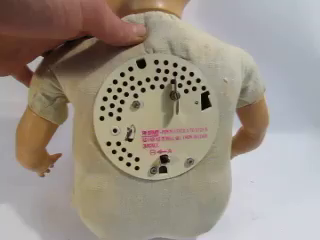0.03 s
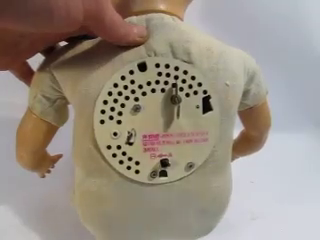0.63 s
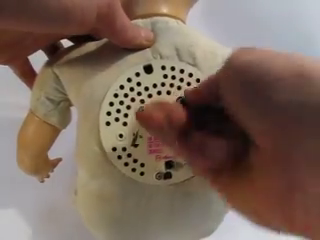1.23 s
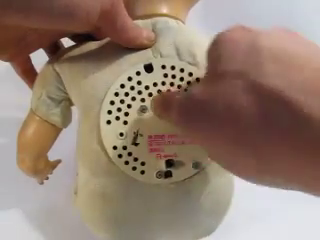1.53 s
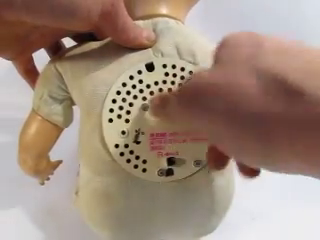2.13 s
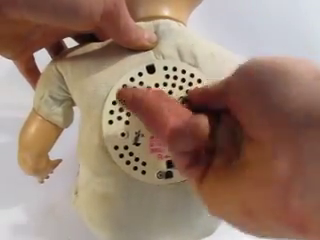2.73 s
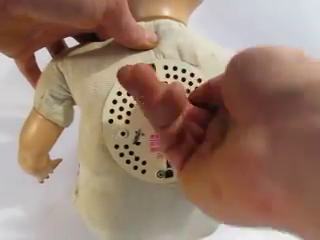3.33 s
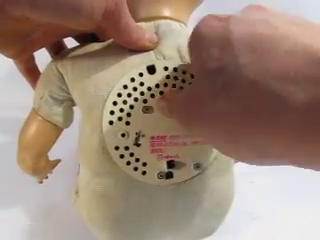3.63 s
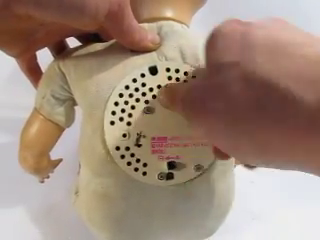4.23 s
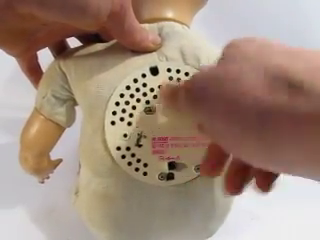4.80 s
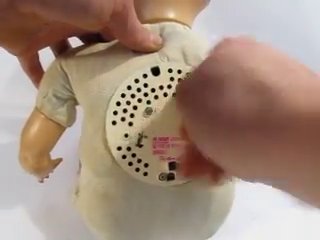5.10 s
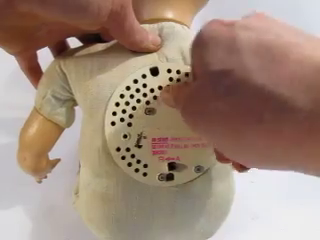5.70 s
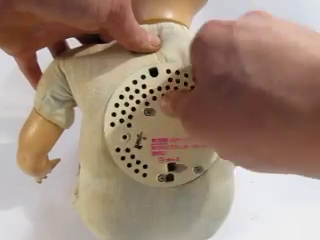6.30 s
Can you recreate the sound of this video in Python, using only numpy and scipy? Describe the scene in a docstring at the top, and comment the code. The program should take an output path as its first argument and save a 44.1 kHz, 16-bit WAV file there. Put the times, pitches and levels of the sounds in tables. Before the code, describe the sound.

For the first second there is only a small room's low rumble and soft hiss, with faint mains hum and a thin whine that stay throughout. A fingernail ticks lightly on the wind-up key of an old cloth doll just before 1 second. Then the key is twisted eight times, close to a stereo microphone, at about 1.1, 1.7, 2.5, 3.1, 3.7, 4.4, 5.0 and 5.7 seconds. Each twist lasts roughly a third of a second: a click as the slack is taken up, a gritty gear grind, two crunchy ratchet snaps, and a knock as the key springs back. That knock is softer at 2 seconds and barely there at 5.3. The clicks ring the plastic case, with a faint steel spring shimmer and short wall reflections. Fingers quietly rub key and cloth around 2.2 and 5.5 seconds, and the stuffed body occasionally thuds softly. The last knock comes just after 6 seconds.

```python
"""The wind-up key of an old cloth-bodied doll, eight twists by hand, close to a stereo camera microphone.
In each twist the key takes up its slack, the gear grinds, the pawl crunches over two teeth, and the key
knocks back as it is let go. It all rings the plastic motor case and, faintly, the mainspring.
Fingers rub and tap between twists. The room is small: near walls, low rumble, hiss, mains hum and a
thin whine."""
import sys
import numpy as np
from scipy import signal
from scipy.fft import rfft, irfft
from scipy.io import wavfile

SR = 44100
rng = np.random.default_rng(int(sys.argv[2]) if len(sys.argv) > 2 else 0)


def put_to_file(sound):
    """Save the sound as 16-bit audio at rate SR, in the file named by the first command-line argument."""
    columns = np.atleast_2d(sound).T  # one column per channel
    safe = np.clip(columns, -1, 1)
    whole_steps = np.round(safe * 32767)
    wavfile.write(sys.argv[1], SR, whole_steps.astype(np.int16))


N = 280035
TIME = np.arange(N) / SR
CLICK_SIZE = 4096  # samples

# Levels are relative within a layer; body, brightness and ping are the tone controls of tone_db.
# twists of the key: (start t/s, stop t/s, drag level/dB, last scrape level/dB, body/dB, brightness/dB)
TWISTS = [(1.11, 1.305, -35, -27, 1, -1), (1.675, 1.955, -43, -34, -1, -1), (2.491, 2.714, -35, -30, 3, 1),
          (3.095, 3.335, -39, -31, -1, 0), (3.72, 3.976, -33, -26, 0, 1), (4.36, 4.595, -35, -28, -2, 0),
          (5.04, 5.279, -34, -26, 0, 1), (5.708, 5.981, -37, -31, -1, 0)]
# the pawl crunches over a tooth and snaps, twice a twist:
# (t/s, crunch level/dB, build/s per 20 dB, fall/s per 20 dB, snap level/dB, body/dB, brightness/dB)
TEETH = [(1.173, -23, 0.0277, 0.0163, -18.5, 1.5, 4.5), (1.2809, -18.5, .015, 0.03, -13, -3, 1.5),
         (1.7442, -21, .008, .022, -13.5, -7, 4.5), (1.9022, -17, 0.0167, 0.0446, -18, -15, 5),
         (2.5386, -25, 0.0533, 0.05, -12, -5, 2), (2.6495, -15, .026, .022, -13, 5, 11),
         (3.143, -17, 0, 0.0251, -14, 2.5, 8), (3.2695, -24, .045, .055, -15.5, -10, 0.5),
         (3.766, -21, 0.0131, .025, -13, -1.5, 5), (3.9035, -17.5, 0.0261, .04, -19, -3.5, 12),
         (4.4121, -21, 0.03, 0.0145, -14.5, -6, 3), (4.5212, -23, 0.018, 0.0529, -12.5, -3, 0.5),
         (5.069, -23, 0.0233, 0.1039, -14, -6.5, 2.5), (5.1864, -24, 0.05, 0.0032, -19, -4, 4),
         (5.7803, -18, .018, 0.0183, -18.5, -7, 2), (5.8995, -19, 0.0236, 0.0468, -16.5, -1.5, 4.5)]
# the loudest catches of the gear: (t/s, level/dB, body/dB, brightness/dB)
CATCHES = [(1.1303, -18.5, -11, -6), (1.166, -17, -7, -2.5), (1.1857, -17.5, 6, 2),
           (1.211, -21.5, -4.5, -6), (1.273, -16, 0, 7.5), (1.3338, -27, -3.5, -0.5), (1.3407, -29, 4, 0.5),
           (1.768, -26.5, -0.5, -4), (1.8224, -35.5, 1, -2.5), (1.889, -17, -15, 3.5),
           (1.9365, -29.5, 3, 4), (2.5081, -29, 0, -2), (2.5334, -19.5, 3.5, 6), (2.5623, -21.5, 2.5, 3.5),
           (2.6168, -27.5, 11.5, -3), (2.7103, -28, -4, -4), (3.1698, -31, 6, 0),
           (3.2975, -18.5, -7.5, -1.5), (3.311, -25.5, 2.5, -2), (3.3888, -28, -3, -1),
           (3.8493, -26, 6.5, 7.5), (3.8706, -24.5, -2, 4), (3.8861, -21.5, -8.5, 6.5),
           (3.9235, -23, -2, 3), (3.934, -20.5, -1, -0.5), (3.9615, -32, -5, -2), (4.0672, -34, -7, 2),
           (4.4035, -13.5, -6.5, 2), (4.4212, -20.5, 1, -3), (4.4445, -23.5, -6, -1.5),
           (4.4513, -24, -1, 1), (4.4645, -28, -3, 2), (4.4872, -28, -5, 1), (4.4998, -24, -6, 1),
           (4.5738, -27, -11, 1.5), (4.5466, -14, -6, 1), (5.0447, -28, 7, 8), (5.0726, -17, -6, -2),
           (5.1186, -30, 6, 3), (5.1702, -27, 2, 6), (5.2241, -20.5, -6, 2.5), (5.7735, -19, -4.5, 9),
           (5.8049, -23.5, 1.5, -1), (5.8278, -33, -3, -4), (5.935, -27.5, -8, -3.5), (6.0369, -29, -3, -7)]
# the key knocks back as it is let go: (t/s, level/dB, body/dB, brightness/dB, ping/dB,
# first touch ahead/s, first touch level/dB, slip back level/dB, ring after/s)
RELEASES = [(1.3728, -14, 1.5, 4, -3.5, .003, -13.5, -31, .128),
            (1.9915, -25.5, 11, 0.5, -3.5, .0048, -25, -50, .07),
            (2.7498, -15.5, 4.5, 4.5, 7, .004, -21, -39, .185),
            (3.4, -13.5, -4, 1, 1, .005, -18, -34, .155), (4.043, -13, 2, 1, 9, .0043, -25, -39, .167),
            (4.6755, -15, 1.5, 0.5, 9, .0048, -23, -38, .222),
            (5.3217, -44, 5, -6.5, 7.5, .005, -52, -56, .11),
            (6.0498, -12.5, -1, 1, 9, .0039, -16, -36, .175)]


def contacts():
    """Blows of key, pawl and gear, and release echoes: (t/s, level/dB, body/dB, brightness/dB, ping/dB)."""
    # a nail meets the key: (t/s, level/dB, body/dB, brightness/dB, ping/dB)
    fingernail = (.959, -38, 7, -11, 5)
    # the key takes up its slack, two rattles and a knock: (t/s, level/dB, body/dB, brightness/dB,
    # ping/dB, first rattle ahead/s, second rattle ahead/s, second rattle level/dB)
    grips = [(1.1332, -15, 8, 4, -2.5, 0.033, 0.027, -19.5),
             (1.6965, -12.5, .5, 4, 7.5, 0.028, 0.014, -19.5),
             (2.4905, -13, -1, -3, -1, 0.013, .0038, -23.5),
             (3.1047, -9.7, 1.5, 1.5, 5.5, 0.023, 0.011, -23),
             (3.7322, -14.5, 4.5, 4.5, -12, 0.02, .0005, -22), (4.368, -15, -3, 7, -5.5, 0.022, .0111, -22),
             (5.0294, -18, 4.5, -2, 9, 0.026, .0159, -30.5), (5.7137, -19, 0, -3, -5, 0.0099, .0024, -25)]
    hits = [fingernail]
    for s, db, body, bright, ping, first, second, rattle_db in grips:
        rattle_tone = (body - 6.5, bright - 5, 0)  # thinner and duller than the knock
        hits.append((s, db, body, bright, ping))
        hits.append((s - first, rattle_db - 11.5, *rattle_tone))
        hits.append((s - second, rattle_db, *rattle_tone))
    for s, db, body, bright, ping, ahead, touch_db, *_ in RELEASES:
        hits.append((s - ahead, touch_db, body - 9, bright - 6, 0))
        hits.append((s, db, body, bright, ping))
        hits.append((s + .0405, db - 25.5, body, bright, 0))  # faint echo of the knock, 40 ms later
    hits += [(s, db, body, bright, 0) for s, _, _, _, db, body, bright in TEETH]
    return hits + [(*row, 0) for row in CATCHES]


def clicks(gain_db=.3):
    """Each slip of the pawl or knock of the key rings the case with its own tone."""
    out = np.zeros((2, N + CLICK_SIZE))
    attack = int(.004 * SR)
    for s, db, *tone in contacts():
        hit = colour(snap(t60=.021, rise_s=.0004), case_db(CLICK_SIZE) + tone_db(*tone))
        attack_rms = np.sqrt(np.mean(hit[:, :attack] ** 2))
        start = int(s * SR)
        out[:, start:start + CLICK_SIZE] += hit * undb(db + gain_db) / attack_rms
    return out[:, :N]


def snap(t60, rise_s):
    """One contact, in stereo: dense reflections build up inside the case, then die away."""
    t = np.arange(CLICK_SIZE) / SR
    envelope = undb(-60 * t / t60) * (1 - np.exp(-t / rise_s))
    return microphone(rng.standard_normal((2, CLICK_SIZE)) * envelope)


def case_db(size, spot_db=4.2):
    """Response of the plastic motor case: each struck spot favours its resonances differently."""
    # resonances of the case and key: (f/Hz, width/Hz, lift/dB)
    modes = [(585, 45, 4), (880, 61, 8), (1000.5, 105, 11.5), (1300, 150, 6), (1560, 140, 9),
             (2117, 130, 11), (2680, 240, 4.5), (3313, 140, 8), (3923, 160, 8), (4980, 100, 6),
             (5590, 210, 8), (6200, 140, 7), (7750, 380, 2.5), (8750, 630, 2.5), (10800, 450, 6),
             (12350, 480, 5), (15320, 130, 6.5)]
    # spectrum of a bare contact: (f/Hz, level/dB)
    contact = [(100, -27.5), (250, -14), (450, -10.5), (800, -3.5), (1300, -5.5), (1780, -7.5), (2400, -1),
               (3400, -3), (4300, -8), (5400, -2), (8000, -3), (10000, -8.5), (14000, -14), (16000, -18.5)]
    favour_db = spot_db * (2 * rng.random(len(modes)) - 1)
    lift = sum((undb(db + extra) ** 2 - 1) * resonance(hz, width, size)
               for (hz, width, db), extra in zip(modes, favour_db))
    return across(contact, size) + 10 * np.log10(np.maximum(1 + lift, .1))


def tone_db(body_db, bright_db, ping_db):
    """Tone of one contact: body below 1.5 kHz, brightness above 4.4 kHz and the steel key's ping."""
    body = across([(150, .5), (500, 1), (1200, 1), (1900, 0)], CLICK_SIZE)
    bright = across([(3600, 0), (5200, 1)], CLICK_SIZE)
    ping = resonance(centre_hz=5450, width_hz=570, size=CLICK_SIZE)
    return body_db * body + bright_db * bright + ping_db * ping


def gear_load():
    """The load on the gear follows whichever drag, scrape or strain is strongest at the moment."""
    surges = []  # (start t/s, stop t/s, level/dB, build/s, fall/s)
    for start, stop, drag_db, scrape_db, *_ in TWISTS:
        surges.append((start, stop - .035, drag_db, .008, .016))
        surges.append((stop, stop, scrape_db, .025, .014))  # the wrist slows
    surges += [(s, s, db, build_s, fall_s) for s, db, build_s, fall_s, *_ in TEETH]
    surges += [(s, s, db - 10, .008, .008) for s, db, *_ in CATCHES]  # grating around each catch
    surges += [(s, s, db, .055, .014) for s, *_, db, _ in RELEASES]  # the key slides back
    load = np.zeros(N)
    for row in surges:
        load = np.maximum(load, surge(*row))
    return load


def grind(slow_hz=140, load_hz=5500, jitter=.7, scatter_db=4.5, gain_db=-2, spot_count=7):
    """The gear sticks and slips unevenly, quicker under load; each twist strikes new spots of the case."""
    load = gear_load()
    slip_hz = slow_hz + load_hz * load
    gap_draw, size_draw = (2 * rng.random((N // 50, 2)) - 1).T
    starts = np.searchsorted(np.cumsum(slip_hz) / SR, np.cumsum(np.exp(jitter * gap_draw)))
    sizes = undb(scatter_db * size_draw)
    spots = rng.integers(0, spot_count, len(starts))
    force = load * np.sqrt(SR / slip_hz / CLICK_SIZE)  # loudness follows load, not slip rate
    gear_db = across([(200, -5), (500, -6), (1000, -1.5), (1600, -2), (2400, 1), (3500, -1),
                      (6000, -1), (14000, -3.5)], CLICK_SIZE)
    out = np.zeros((2, N + CLICK_SIZE))
    for start, stop, _, _, body_db, bright_db in TWISTS:
        first, last = int((start - .012) * SR), int((stop + .11) * SR)
        twist_db = gear_db + tone_db(body_db, bright_db, 0)
        for spot in range(spot_count):
            here = (spots == spot) & (starts >= first) & (starts < last)
            slips = np.bincount(starts[here] - first, sizes[here], last - first) * force[first:last]
            ring = colour(snap(t60=.018, rise_s=.0005), case_db(CLICK_SIZE) + twist_db)
            out[:, first:last + CLICK_SIZE - 1] += signal.oaconvolve(slips[None], unit(ring), axes=1)
    return out[:, :N] * undb(gain_db)


def taps(contact_s=.0007, scuff_db=-7):
    """A soft fingertip rings the slack key, with a little scuff."""
    # fingertips finding the key: (t/s, level/dB)
    touches = [(3.0325, -40), (3.659, -31.5)]
    # modes of the loose key: (f/Hz, t60/s, level/dB)
    key_modes = [(570, 0.024, 0), (759, 0.031, -6), (1055, .025, -5.5), (2450, 0.014, -4.5),
                 (3220, .022, -0.5), (3920, .015, -9.5), (5600, .018, -12.5), (6230, .016, -10),
                 (7250, .012, -10), (8100, .018, -10.5)]
    out = np.zeros((2, N))
    t = np.arange(CLICK_SIZE) / SR
    onset = 1 - np.exp(-t / contact_s)
    for s, db in touches:
        ring = sum(undb(mode_db - 60 * t / t60) * np.sin(2 * np.pi * (hz * t + rng.random()))
                   for hz, t60, mode_db in key_modes)
        scuff = undb(scuff_db) * snap(t60=.02, rise_s=.0005)
        start = int(s * SR)
        out[:, start:start + CLICK_SIZE] += 2 * undb(db) * (ring * onset + scuff)
    return out


def spring(blows, gain_db=-88, detune=.04, coils=7):
    """The blows leave the steel mainspring ringing; its detuned coils beat against each other."""
    # clusters of coil modes: (f/Hz, t60/s, level/dB)
    clusters = [(2260, 0.38, -6.5), (2660, .4, -4.5), (3350, 0.44, 0.5), (5210, 0.6, -8.5),
                (6200, 0.32, -2.5), (7700, 0.36, 1.5)]
    t = np.arange(SR // 2) / SR
    ring = 0
    for hz, t60, db in clusters:
        coils_hz = hz * (1 + detune * (2 * rng.random((coils, 1)) - 1))
        phases = rng.uniform(0, 2 * np.pi, (coils, 1))
        ring += undb(db - 60 * t / t60) * np.sin(2 * np.pi * coils_hz * t + phases).sum(axis=0)
    return undb(gain_db) * signal.oaconvolve(blows, ring[None], axes=1)[:, :N]


def after_ring(half_width_s=.012, db=-61.5):
    """A faint, brief ring near 2.6 kHz shortly after each release."""
    # spectrum of the ring: (f/Hz, level/dB)
    spectrum = [(1000, -22), (1900, -20), (2250, -3), (2600, 0), (2850, -2), (3200, -9), (3800, -25),
                (7000, -24), (8000, -19), (9000, -30)]
    return noise(spectrum) * swells([(s + after, half_width_s, db) for s, *_, after in RELEASES])


def fingers(grain_db=1.5, grain_hz=400):
    """Skin rubs the key in small catches that ring the case, and brushes the cloth."""
    # fingers taking a new grip: (t/s, half width/s, level/dB)
    rubs = [(2.06, 0.0065, -52), (2.121, .0025, -51), (2.226, 0.0051, -43.5), (2.245, 0.0047, -42),
            (2.345, .011, -51), (2.374, 0.0075, -46), (5.454, 0.0073, -44.5), (5.466, 0.0062, -50),
            (5.55, .02, -60.5)]
    # skin excites the case mostly in the upper middle: (f/Hz, level/dB)
    rub_colour = [(200, -16), (1000, -1), (1700, -3.5), (2200, 2.5), (2520, 6), (2900, 3.5), (3900, -14.5),
                  (5600, -7), (9000, -14.5), (11000, -9), (16000, -23)]
    # strokes over the cloth body: (t/s, half width/s, level/dB)
    brushes = [(2.14, 0.031, -72), (2.236, 0.0075, -49.5), (2.372, 0.008, -54.5), (4.279, 0.0024, -62.5)]
    # spectrum of brushed cloth: (f/Hz, level/dB)
    brush_colour = [(500, -4), (2000, 1), (4200, -12), (6300, 2), (9000, -7), (11000, 2), (13000, -19),
                    (16000, -22)]
    roughness = np.interp(TIME * grain_hz, np.arange(N // 20), rng.standard_normal(N // 20))
    grain = undb(grain_db * roughness)
    friction = microphone(rng.standard_normal((2, N))) * grain
    rub = unit(colour(friction, case_db(N) + across(rub_colour, N))) * swells(rubs)
    brush = noise(brush_colour) * unit(grain) * swells(brushes)
    return rub + brush


def body_thuds():
    """The stuffed body thuds softly as it shifts under the hand."""
    # shifts of the body: (t/s, half width/s, level/dB)
    shifts = [(1.283, .019, -51), (2.18, .015, -54), (2.36, .028, -49), (2.64, .014, -46),
              (4.03, .035, -48), (5.85, .02, -48)]
    stuffing = noise([(30, -19), (70, -6.5), (120, 1.5), (165, -7), (230, -26), (500, -45), (2000, -74)])
    return stuffing * swells(shifts)


def room(x, wet_db=-24.5, first_s=.024, hold_s=.058, t60=.095, late_db=-23, late_t60=.42):
    """Near walls answer evenly for a moment, then the sound drops quickly into a faint tail."""
    t = np.arange(SR // 2) / SR
    early = undb(-60 * np.maximum(t - hold_s, 0) / t60)
    late = undb(late_db - 60 * t / late_t60)
    echoes = microphone(rng.standard_normal((2, len(t))) * (early + late) * (t > first_s))
    walls = [(200, -1.5), (1000, -.5), (2300, -5), (4200, 2), (5500, -7), (7000, -4), (14000, -2)]
    response = unit(colour(echoes, across(walls, len(t)))) / np.sqrt(len(t))
    return undb(wet_db) * signal.oaconvolve(x, response, axes=1)[:, :N]


def rumble(drone_hz=40.5, waver_hz=3.2, drone_db=-4.2, noise_db=-1.5):
    """The room's low end: a wavering drone over rumble, a little right of centre."""
    # rise and fall of both: (t/s, level/dB)
    levels = [(0, -77), (.04, -42.5), (.55, -48.5), (.75, -43), (1.05, -43), (1.5, -53), (2.4, -51),
              (3.5, -60), (4.4, -53), (4.85, -57), (5.5, -54), (6.35, -54)]
    # spectrum of the rumble: (f/Hz, level/dB)
    spectrum = [(20, -2.5), (32, -0.5), (50, -3), (62, -7), (85, -15), (110, -11), (170, -26), (400, -37),
                (1000, -60.5)]
    waver = np.interp(TIME, np.linspace(0, TIME[-1], N // 4000), rng.standard_normal(N // 4000))
    drone = np.sqrt(2) * np.sin(2 * np.pi * np.cumsum(drone_hz + waver_hz * waver) / SR)
    low = undb(drone_db) * drone + undb(noise_db) * noise(spectrum)
    pan = undb([[-1.2], [1.2]])
    return low * curve(levels) * pan


def air():
    """Airy room hiss, swelling as the arm reaches in."""
    # rise and fall of the hiss: (t/s, level/dB)
    levels = [(0, -93), (.04, -65.5), (.5, -62.5), (.95, -54.5), (1.55, -65), (2.15, -58), (2.9, -62.5),
              (3.6, -62.5), (4.85, -70.5), (5.6, -65), (6.35, -66)]
    # spectrum of the hiss: (f/Hz, level/dB)
    spectrum = [(60, 4), (200, 0.5), (400, -2.5), (800, -6), (1600, -10.5), (3200, -16), (7000, -21),
                (11000, -23), (15000, -25.5)]
    return noise(spectrum) * curve(levels)


def hum():
    """Mains hum and a thin electronic whine, steady and centred."""
    # hum and whine: (f/Hz, rms level/dB)
    tones = [(119.8, -67.5), (15700, -77.5)]
    return sum(undb(db) * np.sqrt(2) * np.sin(2 * np.pi * hz * TIME) for hz, db in tones)


def microphone(pair):
    """Two unrelated signals become left and right: alike in the bass, less so in the treble."""
    # difference between the two microphone ports: (f/Hz, side minus mid/dB)
    port_side = [(40, -14), (120, -11), (300, -17), (700, -25), (1300, -24), (3000, -18), (4400, -8),
                 (5800, -14), (8000, -8), (10000, -4), (15000, -3.5)]
    # balance of the ports: (f/Hz, left minus right/dB)
    port_balance = [(500, -.5), (1600, -.3), (2300, -3.5), (3600, -4), (5000, 2), (6500, .5), (7800, 2.2),
                    (9300, 2.2), (11000, .8), (15000, 1)]
    size = pair.shape[-1]
    spread = undb(across(port_side, size))
    mid, side = rfft(pair) / np.sqrt(1 + spread ** 2)
    sign = np.array([[1], [-1]])
    balance = undb(sign * across(port_balance, size) / 2)
    return irfft((mid + sign * spread * side) * balance, size)


def noise(spectrum):
    """Steady stereo noise at unit rms, shaped by (f/Hz, level/dB) rows."""
    return unit(colour(microphone(rng.standard_normal((2, N))), across(spectrum, N)))


def colour(x, db):
    """Minimum-phase filter with the given dB at each bin, so that resonances ring after a blow."""
    size = x.shape[-1]
    cepstrum = irfft(np.log(undb(db)), size)
    cepstrum[1:(size + 1) // 2] *= 2
    cepstrum[size // 2 + 1:] = 0
    return irfft(rfft(x) * np.exp(rfft(cepstrum)), size)


def resonance(centre_hz, width_hz, size):
    """A resonant peak of height 1, at the bins of a transform."""
    hz = np.fft.rfftfreq(size, 1 / SR)
    return 1 / (1 + (2 * (hz - centre_hz) / width_hz) ** 2)


def across(rows, size):
    """(f/Hz, value) rows joined on a log axis, at the bins of a transform."""
    hz, value = np.transpose(rows)
    return np.interp(np.log(np.fft.rfftfreq(size, 1 / SR) + 1), np.log(hz), value)


def surge(start, stop, db, build_s, fall_s, roundness=1.5):
    """Gain that builds up to start, holds until stop and falls away, by 20 dB in the given times."""
    away = np.maximum((start - TIME) / build_s, (TIME - stop) / fall_s).clip(0)
    near = away < 4  # silent from 80 dB down
    gain = np.zeros(N)
    gain[near] = undb(db - 20 * np.minimum(away[near] ** roundness, away[near]))
    return gain


def swells(rows):
    """Bell-shaped gain swells from (t/s, half width/s, level/dB) rows."""
    return sum(undb(db) * np.exp(-((TIME - s) / half) ** 2 / 2) for s, half, db in rows)


def curve(rows):
    """Gain over time from (t/s, level/dB) rows."""
    return undb(np.interp(TIME, *np.transpose(rows)))


def undb(db):
    """Decibels to gain."""
    return 10 ** (np.asarray(db) / 20)


def unit(x):
    """Scale to an rms of 1."""
    return x / np.sqrt(np.mean(x ** 2))


def scene():
    """Close up, the winding and the hand on the doll; behind them the walls and the room tone."""
    winding = clicks() + grind() + taps()
    ringing = spring(winding) + room(winding) + after_ring()
    handling = fingers() + body_thuds()
    return winding + ringing + handling + rumble() + air() + hum()


def record(dry, top_hz=15850):
    """The camera clips at full scale and cuts the top."""
    lowpass = signal.ellip(8, .2, 70, top_hz, fs=SR, output="sos")
    return signal.sosfilt(lowpass, np.clip(dry, -1, 1))


dry = scene()
out = record(dry)
put_to_file(out)
```